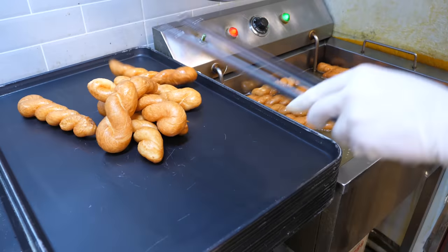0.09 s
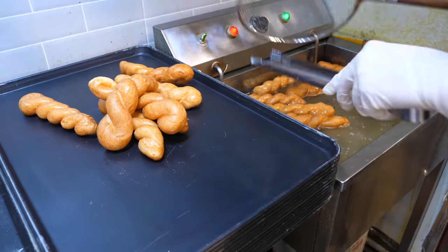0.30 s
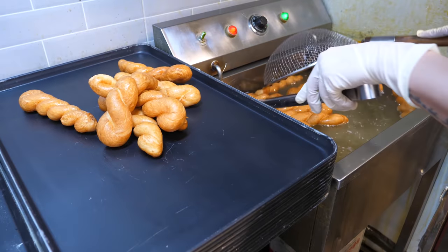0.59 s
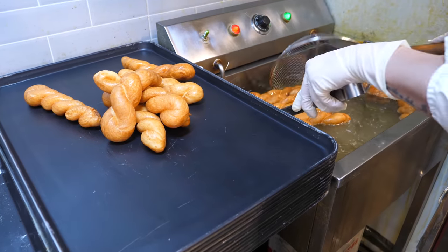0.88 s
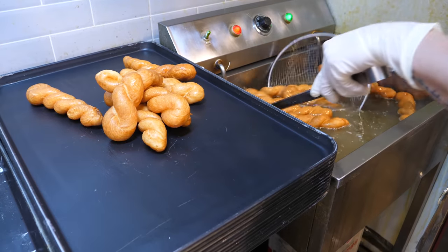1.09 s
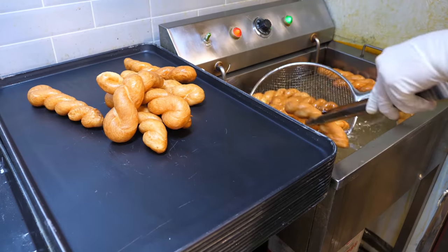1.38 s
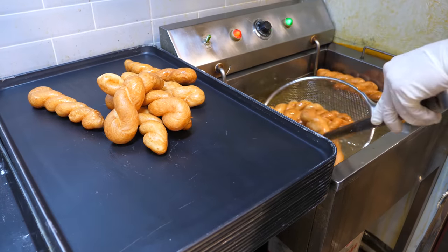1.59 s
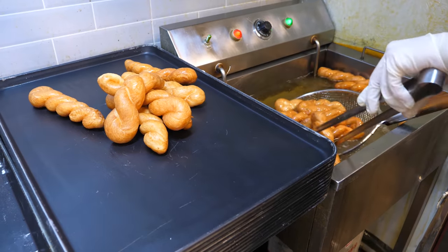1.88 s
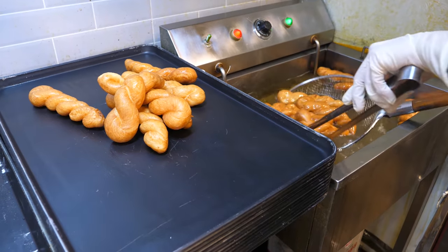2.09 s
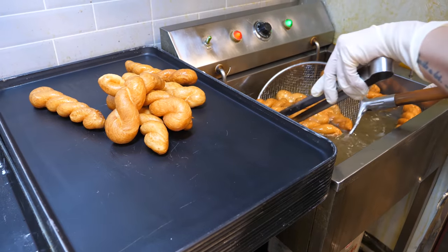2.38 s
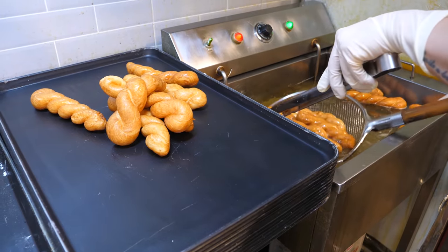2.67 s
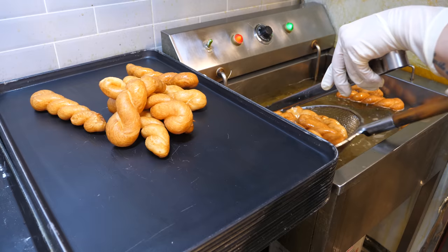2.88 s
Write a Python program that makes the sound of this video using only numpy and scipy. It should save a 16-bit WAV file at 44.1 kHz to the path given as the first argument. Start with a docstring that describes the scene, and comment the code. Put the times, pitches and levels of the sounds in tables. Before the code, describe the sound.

A wire strainer knocks on a steel deep fryer while tongs clink over frying hiss and fan roar

```python
"""A wire strainer scoops fried dough out of a steel deep fryer: its knocks excite the decaying modes of the tank.
Steel tongs clink as beating pairs of high modes, each with a short rasp of noise.
Stirred oil sloshes as fluctuating low noise, and tiny scrapes excite the resonances of the tank.
A draught buffets the microphone with very low noise, levelled off at its strongest.
An extractor fan roars, hums and whines under frying hiss and fizz; this background dips briefly at times."""
import sys
import numpy as np
from scipy import signal
from scipy.fft import rfft, irfft, next_fast_len
from scipy.io import wavfile
from scipy.ndimage import map_coordinates

SR = 44100
rng = np.random.default_rng(int(sys.argv[2]) if len(sys.argv) > 2 else 0)


def unload_wav(signal):
    """Save mono or channel-first audio to the path in sys.argv[1] as 16-bit WAV at rate SR, clipped to [-1, 1]."""
    wavfile.write(
        sys.argv[1],
        SR,
        np.round(np.clip(np.atleast_2d(signal).T, -1, 1) * 32767).astype(np.int16),
    )


N = 132300  # samples: 3 s
RING_T = np.arange(SR * 3 // 5) / SR  # time axis of one blow, s
TWIN_DB = -9.5  # level of the close twin of each mode, relative to the mode


def amp(db):
    """Level law: decibels to amplitude gain."""
    return 10 ** (np.asarray(db) / 20)


def unit(x):
    """Normalisation to an rms of 1."""
    return x / np.sqrt(np.mean(x ** 2) + 1e-20)


def along(points, hz):
    """Interpolation of (frequency, value) points on a logarithmic frequency axis."""
    point_hz, value = np.transpose(points)
    return np.interp(np.log(hz + 1), np.log(point_hz + 1), value)


def curve(rows):
    """Envelope: linear interpolation of (time, value) points, one value per sample."""
    return np.interp(np.arange(N) / SR, *np.transpose(rows))


def wobble(knots_per_s):
    """Slow fluctuation: a smooth curve through random knots."""
    knots = rng.standard_normal(int(N * knots_per_s / SR) + 4)
    return map_coordinates(knots, [np.arange(N) * knots_per_s / SR])


def filtered(x, response):
    """Linear filtering: the spectrum of x times a response of frequency."""
    size = next_fast_len(len(x) + SR // 2)  # padded so that the tail does not wrap round
    spectrum = rfft(x, size) * response(np.fft.rfftfreq(size, 1 / SR))
    return irfft(spectrum, size)[:len(x)]


def noise(spectrum):
    """Coloured noise: white noise shaped by a spectrum, with an rms of 1."""
    return unit(filtered(rng.standard_normal(N), lambda hz: amp(along(spectrum, hz))))


def specks(per_s):
    """Shot noise: tiny impulses at random moments, of random size."""
    return (rng.random(N) < per_s / SR) * rng.standard_normal(N)


def fade(t, t60):
    """Exponential free decay: 60 dB in t60 seconds."""
    return np.exp(-np.log(1000) * t / t60)


def rise(attack_s):
    """Exponential onset of a blow, with a time constant of attack_s."""
    return 1 - np.exp(-RING_T / attack_s)


def add(track, start_s, sound):
    """Superposition: mix a sound into the track at its start."""
    part = track[round(start_s * SR):][:len(sound)]
    part += sound[:len(part)]


def ring(modes, lift_db, split):
    """Modal ringing: pairs of close modes start together, beat and decay, a little different at every blow."""
    hz, db, t60 = np.transpose(modes)
    gain = amp(db + lift_db + rng.standard_normal(len(hz)))
    twin_hz = hz * (1 + split * rng.standard_normal(len(hz)))
    start_cycles = rng.random((len(hz), 1))

    def tone(f):
        return np.sin(2 * np.pi * (f[:, None] * RING_T + start_cycles))

    pairs = tone(hz) + amp(TWIN_DB) * tone(twin_hz)
    return gain @ (pairs * fade(RING_T, t60[:, None])) / (1 + amp(TWIN_DB))


# strainer blows on the tank: start_s, ring_gain_db, favoured_pitch_hz, favoured_lift_db,
# clatter_level_db, clatter_cutoff_hz
STRAINER_KNOCKS = [(.181, -22.5, 713, 25, -27.5, 1520), (1.1668, -8, 338, 16.5, -20.5, 4660),
                   (1.178, -17, 1100, 11, -23, 3460), (1.217, -14, 330, 18, -35, 1500),
                   (1.268, -23, 342, 10, -32, 900), (1.836, -4, 578, 11, -19, 2260),
                   (1.841, -0.5, 359, 9, -18, 2130), (2.7978, -8.5, 510, 2, -17.5, 3230),
                   (2.829, -15, 535, 12, -29, 1900), (2.843, -17, 1450, 10, -24, 2970),
                   (2.868, -10.5, 536, 14, -33.5, 2600), (2.957, -46, 535, 5, -30, 3530)]
# modes of the tank: pitch_hz, relative_level_db, t60_s
TANK_MODES = [(308, -25, .25), (335, -20, .32), (353, -22, .22), (386, -18, .24), (465, -28, .25),
              (502, -27, .25), (549, -25, .34), (568, -19, .26), (635, -28, .25), (682, -26, .25),
              (738, -21, .22), (1095, -24, .15), (1357, -29, .2), (1510, -30, .18)]
SPOT_OCTAVES = .1  # spread of the modes that a struck spot favours
TANK_SPLIT = .015  # random offset of a twin, as a share of the pitch
RING_ATTACK_S = .002


def strainer():
    """Modal excitation: each knock rings the tank, and the spot that is struck favours some of its modes."""
    out = np.zeros(N)
    mode_hz = np.transpose(TANK_MODES)[0]
    for start_s, ring_db, spot_hz, lift_db, clatter_db, cut_hz in STRAINER_KNOCKS:
        favour = np.exp(-.5 * (np.log2(mode_hz / spot_hz) / SPOT_OCTAVES) ** 2)
        tank_ring = ring(TANK_MODES, lift_db * favour, TANK_SPLIT) * rise(RING_ATTACK_S)
        add(out, start_s, amp(ring_db) * tank_ring)
        add(out, start_s, amp(clatter_db) * clatter(cut_hz))
    return out


# spectrum of the dense upper modes of sheet steel and wire: frequency_hz, relative_density_db_per_hz
CLATTER_SPECTRUM = [(100, -30), (220, -3), (330, 10), (480, 4.5), (740, 8.5), (860, -2.5), (1150, 0),
                    (1500, 1.5), (1980, 1.5), (2250, -2.5), (2800, -1), (3800, -4), (5200, -2), (8000, -14),
                    (16000, -36)]
# decay of those modes: frequency_hz, t60_s
CLATTER_DECAY = [(300, 0.31), (1000, 0.25), (2500, 0.12), (6000, 0.13), (14000, .07)]
CLATTER_ATTACK_S = .0015
CRACK_DB, CRACK_T60_S = 2, .014  # first instant of contact: level over the clatter, decay


def clatter(cut_hz):
    """Statistical modal decay: noise fades band by band under a brief crack; a soft contact lacks high modes."""
    def colour(hz):
        return amp(along(CLATTER_SPECTRUM, hz)) / np.sqrt(1 + (hz / cut_hz) ** 6)

    steady = unit(filtered(rng.standard_normal(len(RING_T)), colour))
    hz, t, bands = signal.stft(steady, SR, nperseg=256)
    decaying = bands * fade(t, along(CLATTER_DECAY, hz)[:, None])
    tail = signal.istft(decaying, SR, nperseg=256)[1][:len(RING_T)]
    crack = unit(filtered(rng.standard_normal(len(RING_T)), colour)) * fade(RING_T, CRACK_T60_S)
    return tail * rise(CLATTER_ATTACK_S) + amp(CRACK_DB) * crack


# blows of the tongs: start_s, ring_gain_db, rasp_level_db, rasp_centre_hz
TONG_CLINKS = [(0.071, -20, -48, 11600), (0.179, -27, -50, 9000), (.489, -31, -59, 12100),
               (.729, 2.5, -33, 7800), (.732, -27, -30, 1450), (0.748, -11, -30.5, 4940),
               (0.809, -14, -32.5, 2000), (1.1649, -20, -34.5, 7200), (1.837, -15, -49, 7160),
               (2.081, -14.5, -35.5, 5070), (2.798, -27, -46.5, 8000), (2.842, -21, -50, 5960),
               (2.888, -19, -48, 11500)]
# modes of the tongs: pitch_hz, relative_level_db, t60_s
TONG_MODES = [(1265, -35, .17), (1792, -36, .15), (4053, -34, .1), (4955, -39, .17), (5200, -40, .17),
              (6158, -40, .15), (7175, -30, .12), (7644, -41, .14), (8099, -30, .08), (9010, -42, .13),
              (10010, -38, .13), (11420, -37, .09), (12801, -41, .11), (13713, -43, .08)]
TONG_SPLIT = .00099  # random offset of a twin, as a share of the pitch
RASP_OCTAVES = .75  # from the centre to half amplitude
RASP_T60_S, CLINK_ATTACK_S = .15, .0015


def tongs():
    """Modal ringing of steel tongs: bright clinks, each with a short band-limited rasp of wire mesh."""
    out = np.zeros(N)
    for start_s, ring_db, rasp_db, centre_hz in TONG_CLINKS:
        def band(hz):
            return 1 / (1 + (np.log2((hz + 1) / centre_hz) / RASP_OCTAVES) ** 4)

        rasp = unit(filtered(rng.standard_normal(len(RING_T)), band)) * fade(RING_T, RASP_T60_S)
        clink = amp(ring_db) * ring(TONG_MODES, 0, TONG_SPLIT) + amp(rasp_db) * rasp
        add(out, start_s, clink * rise(CLINK_ATTACK_S))
    return out


def tank_walls(f):
    """Modal superposition: the tank's response is a sum of damped resonances of alternating sign."""
    total = 0
    for k, (hz, db, t60) in enumerate(TANK_MODES):
        damping = 1j * f * np.log(1000) / np.pi / t60
        total = total + (-1) ** k * amp(db) * 1j * f / (hz * hz - f * f + damping)
    return total


# envelope of the stirring: time_s, gain_db
STIR_LEVEL = [(0, -44), (.55, -40.5), (.68, -36), (.85, -42.5), (1.02, -50.5), (1.12, -32.5), (1.28, -29.5),
              (1.5, -31.5), (1.75, -34.5), (1.98, -34), (2.15, -41), (2.42, -44), (2.55, -35),
              (2.75, -34.5), (3, -32)]
# spectrum of the moving oil: frequency_hz, relative_density_db_per_hz
SLOSH_SPECTRUM = [(120, 8), (210, -0.5), (340, -0.5), (480, -1), (700, -4.5), (900, -11.5), (1500, -15),
                  (2600, -20.5), (5000, -40.5)]
SLOSH_DB, SCRAPE_DB = 1.5, -4.5  # relative to the stirring envelope
SCRAPE_PER_S = 90  # mean rate of scraping impulses
SLOSH_SWING_DB, SLOSH_PER_S = 2.2, 25  # size and knots a second of the random swings


def stirring():
    """Flow noise and resonance: oil sloshes through the mesh while the rim scrapes lightly along the tank."""
    scrape = unit(filtered(specks(SCRAPE_PER_S), tank_walls))
    slosh = noise(SLOSH_SPECTRUM) * amp(SLOSH_SWING_DB * wobble(SLOSH_PER_S))
    return amp(curve(STIR_LEVEL)) * (amp(SLOSH_DB) * slosh + amp(SCRAPE_DB) * scrape)


# envelope of the buffeting: time_s, relative_level_db
DRAUGHT_LEVEL = [(0, -38), (.33, -35), (.39, -29.5), (.45, -33), (.72, -32.5), (.82, -11.5), (.93, -24),
                 (1.03, -28), (1.15, -28.5), (1.42, -40.5), (1.56, -24.5), (1.73, -41.5), (1.9, -43),
                 (1.97, -18.5), (2.12, -29.5), (2.18, -13), (2.3, -22), (2.4, -15), (2.52, -25),
                 (2.68, -29), (2.77, -37), (3, -34)]
# spectrum of the buffeting: frequency_hz, relative_density_db_per_hz
BUFFET_SPECTRUM = [(2, -7.5), (9, 3), (16, 6), (24, -10), (33, -28), (44, -15.5), (60, -24), (100, -23.5),
                   (170, -53), (300, -66), (1000, -120)]
BUFFET_DB = 14.5  # gain added to the envelope
BUFFET_TOP = .61  # amplitude at which pushes level off, full scale = 1


def draught():
    """Turbulent pressure: moving air pushes slowly on the microphone, and the strongest pushes saturate."""
    push = amp(curve(DRAUGHT_LEVEL) + BUFFET_DB) * noise(BUFFET_SPECTRUM)
    return BUFFET_TOP * np.tanh(push / BUFFET_TOP)


# envelope of the background: time_s, gain_db
BACKGROUND_LEVEL = [(0.0, -49), (0.12, -48), (0.68, -45.5), (0.83, -51.5), (1.08, -49.5), (1.32, -45),
                    (1.74, -45), (1.96, -45.5), (2.18, -51), (2.43, -52), (2.87, -44.5), (3.0, -45.5)]
# spectrum of fan air and frying hiss: frequency_hz, relative_density_db_per_hz
AIR_SPECTRUM = [(500, -20), (900, -2), (1300, -2.5), (1550, -10), (1800, -7), (2050, -12), (2550, -7),
                (3100, -6.5), (3500, -10.5), (4200, -10.5), (4800, -10.5), (5350, -15.5), (5800, -14.5),
                (6600, -19.5), (7300, -17.5), (8400, -18.5), (9100, -23.5), (11000, -27.5), (14500, -28.5),
                (16000, -41)]
# spectrum of the fan's low roar: frequency_hz, relative_density_db_per_hz
ROAR_SPECTRUM = [(40, 6), (70, -8), (125, 5.5), (200, -0.5), (400, -8), (700, -23), (1100, -34.5),
                 (2000, -56.5)]
AIR_DB, ROAR_DB, FIZZ_DB = 3, 11.5, -7.5  # relative to the background envelope
FIZZ_PER_S = 180  # mean rate of fizzing impulses


def background():
    """Broadband and shot noise: the fan's roar, hiss and whine, with the fine fizz of frying."""
    def fizz_colour(hz):
        return amp(along(AIR_SPECTRUM, hz)) * hz / (hz + 5000)  # leans to the treble

    fizz = unit(filtered(specks(FIZZ_PER_S), fizz_colour))
    hiss = amp(AIR_DB) * noise(AIR_SPECTRUM)
    roar = amp(ROAR_DB) * noise(ROAR_SPECTRUM)
    return amp(curve(BACKGROUND_LEVEL)) * (hiss + roar + whine() + amp(FIZZ_DB) * fizz)


# whine of the fan: pitch_hz, width_hz, level_db relative to the background envelope
FAN_WHINE = [(1717, 15.4, -7), (1828, 17.6, -7.5), (2196, 14.5, -10), (2440, 10.7, -8), (2915, 12.2, -4.5),
             (3250, 9, -18.5), (4580, 61, -10), (5170, 32, -9), (5270, 35, -10.5), (7040, 147, -16)]
FAN_TURNS_HZ, WHINE_PULSE = 22.1, .45  # the whine pulses once a turn, this deep (1 = fully)


def whine():
    """Phase diffusion and amplitude modulation: fan tones blurred in pitch, each pulsing with the rotation."""
    out = np.zeros(N)
    t = np.arange(N) / SR
    for hz, width_hz, db in FAN_WHINE:
        # a random walk of phase widens the spectral line
        blur = np.cumsum(rng.standard_normal(N)) * np.sqrt(2 * np.pi * width_hz / SR)
        pulse = 1 + WHINE_PULSE * np.cos(2 * np.pi * (FAN_TURNS_HZ * t + rng.random()))
        out += amp(db) * unit(pulse * np.sin(2 * np.pi * hz * t + blur))
    return out


# low hum tones near 59, 119 and 177 Hz: pitch_hz, mean_level_db (rms)
FAN_HUM = [(59.3, -47), (118.6, -35), (176.5, -40)]


def hum():
    """Tonal radiation: the fan's low hum tones, slightly unsteady in level and phase."""
    out = np.zeros(N)
    t = np.arange(N) / SR
    for hz, db in FAN_HUM:
        gain = amp(db + .67 * wobble(6.9)) * np.sqrt(2)  # rms to peak
        out += gain * np.sin(2 * np.pi * hz * t + .4 * wobble(5.8))
    return out


def scene():
    """Superposition of all sources at one microphone beside the fryer."""
    return (strainer() + tongs() + stirring() + background() + hum() + draught())[None]


TOP_HZ = 16000  # band limit of the recorder


def record(dry):
    """Band limitation: a very steep low-pass lets almost nothing through above the recorder's limit."""
    return filtered(dry[0], lambda hz: 1 / (1 + (hz / TOP_HZ) ** 200))[None]


dry = scene()
out = record(dry)
unload_wav(out)
```